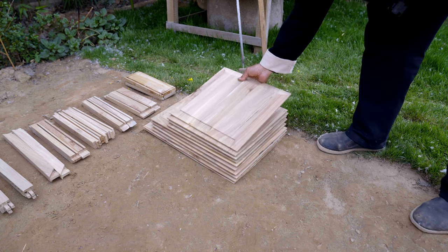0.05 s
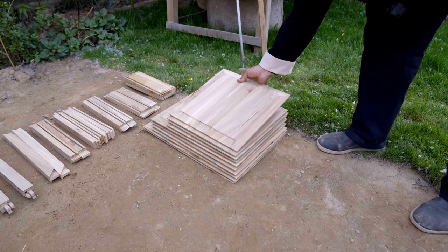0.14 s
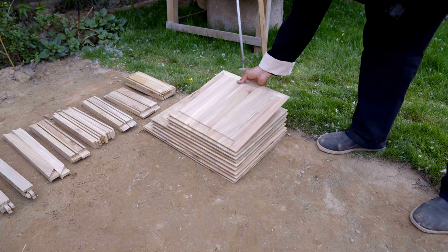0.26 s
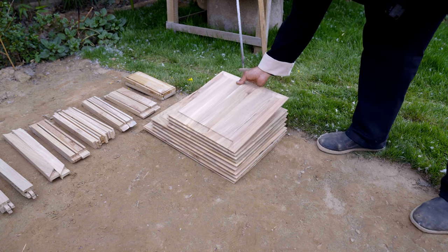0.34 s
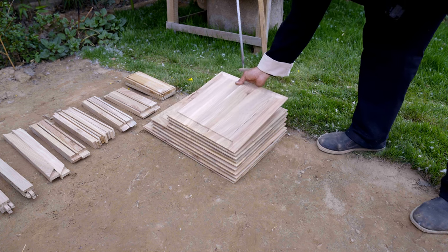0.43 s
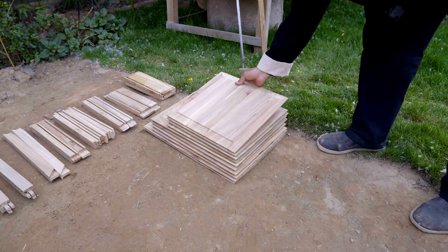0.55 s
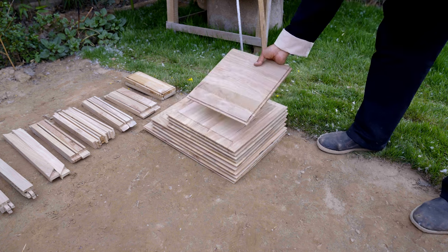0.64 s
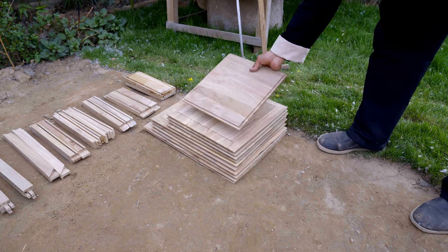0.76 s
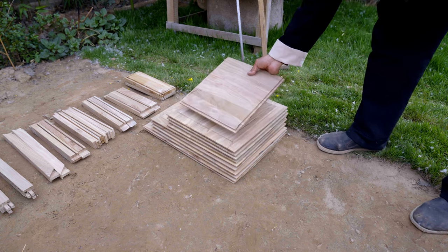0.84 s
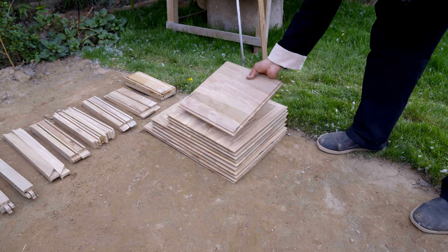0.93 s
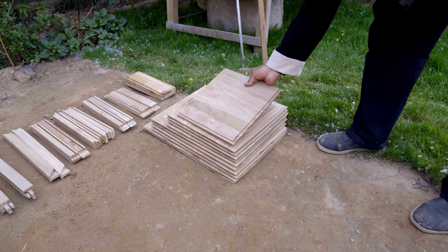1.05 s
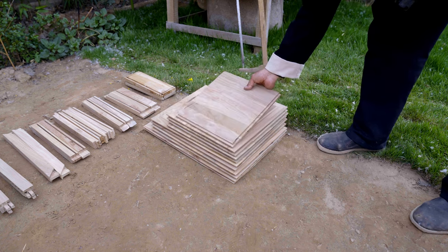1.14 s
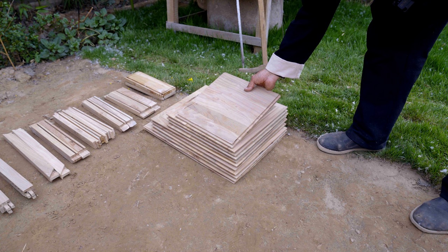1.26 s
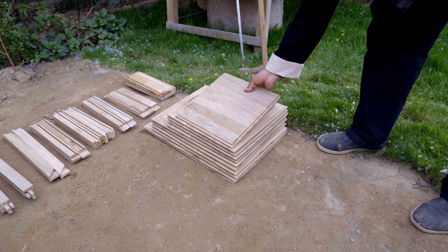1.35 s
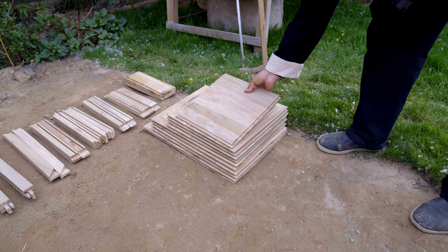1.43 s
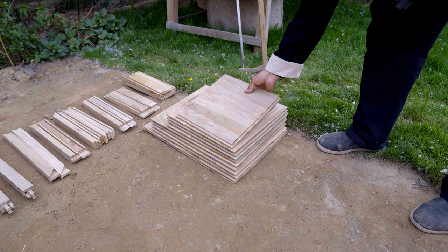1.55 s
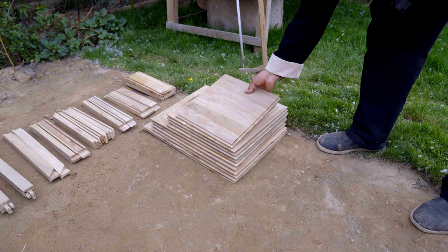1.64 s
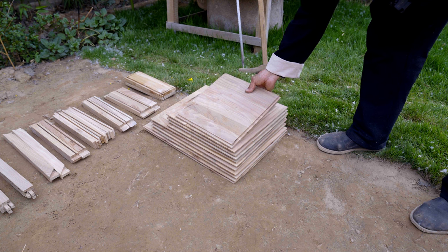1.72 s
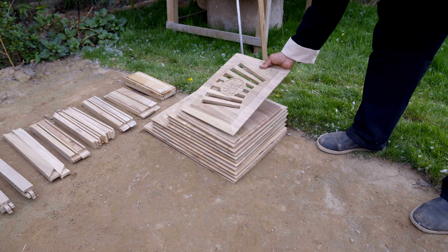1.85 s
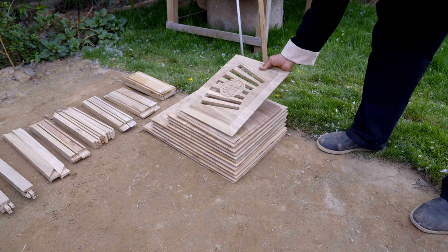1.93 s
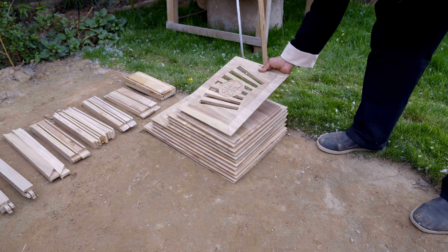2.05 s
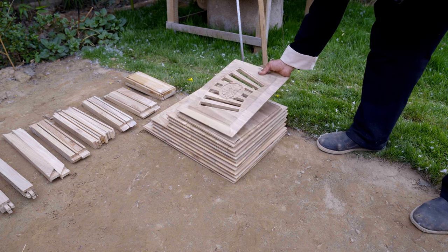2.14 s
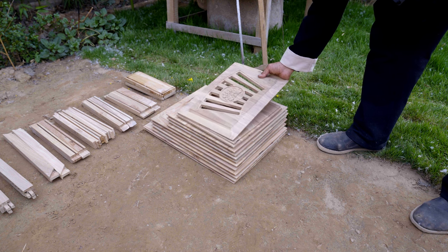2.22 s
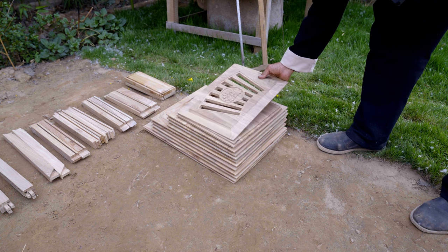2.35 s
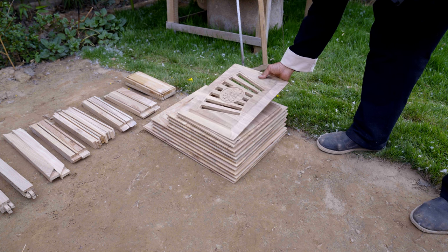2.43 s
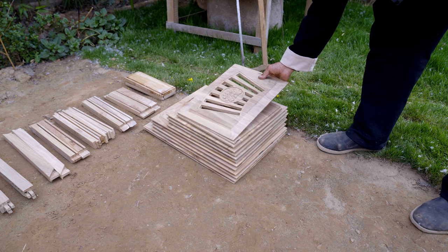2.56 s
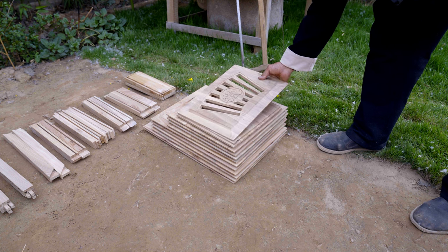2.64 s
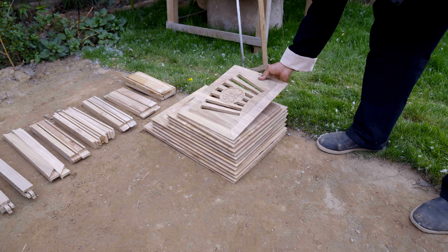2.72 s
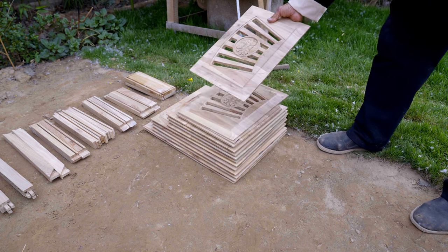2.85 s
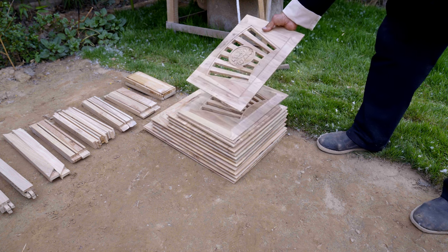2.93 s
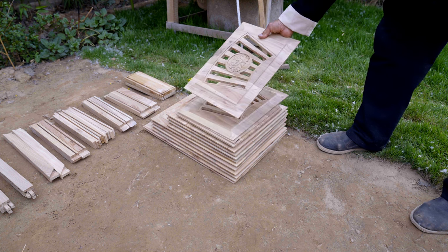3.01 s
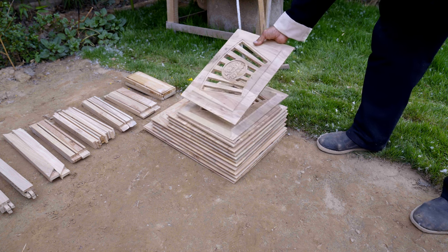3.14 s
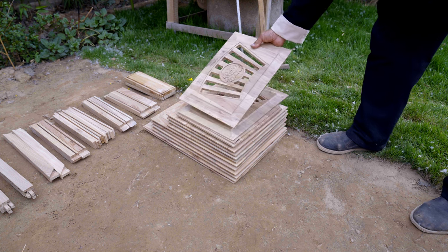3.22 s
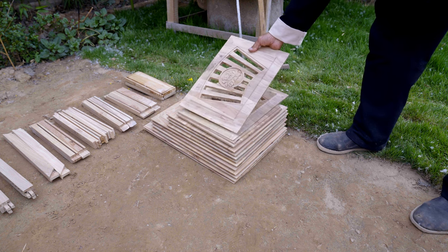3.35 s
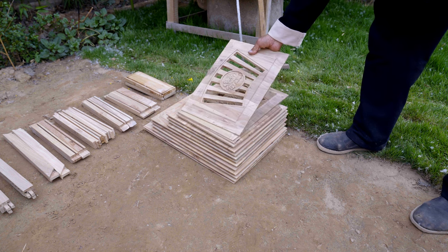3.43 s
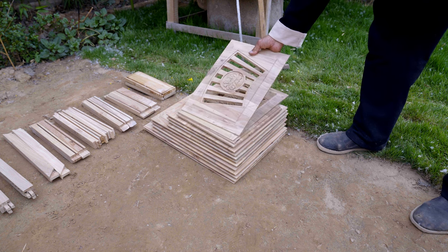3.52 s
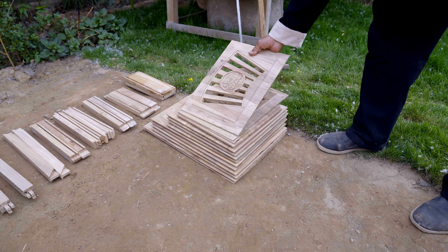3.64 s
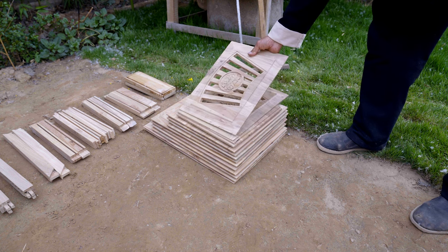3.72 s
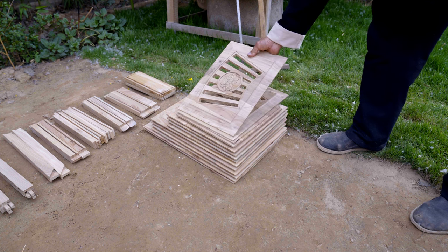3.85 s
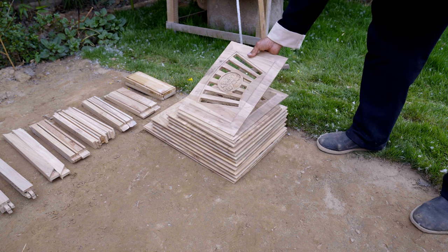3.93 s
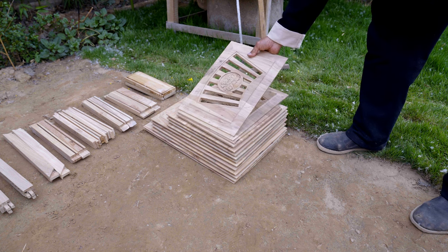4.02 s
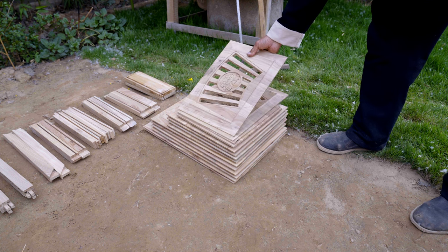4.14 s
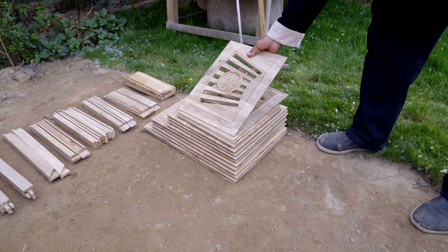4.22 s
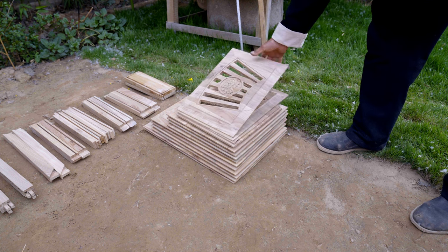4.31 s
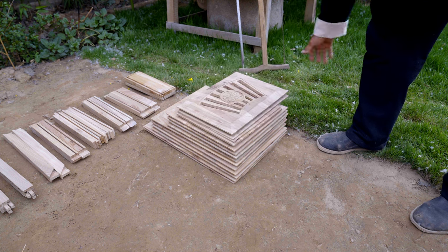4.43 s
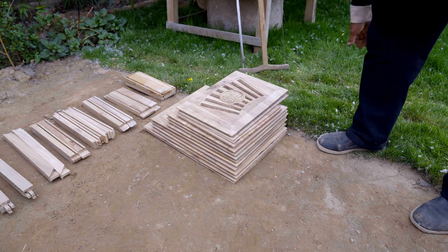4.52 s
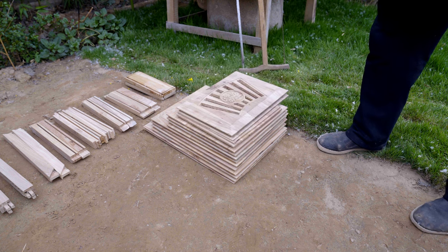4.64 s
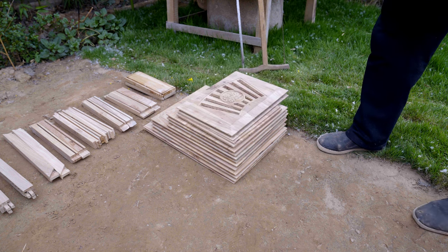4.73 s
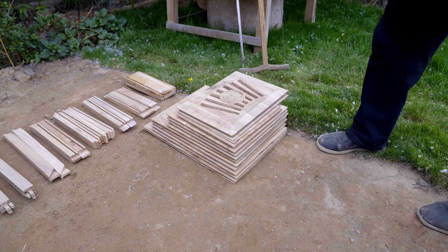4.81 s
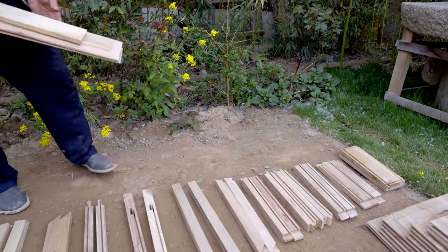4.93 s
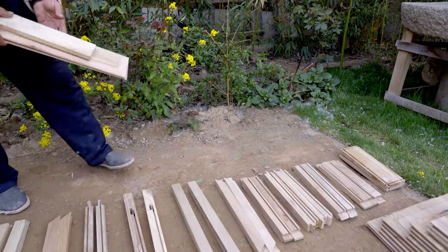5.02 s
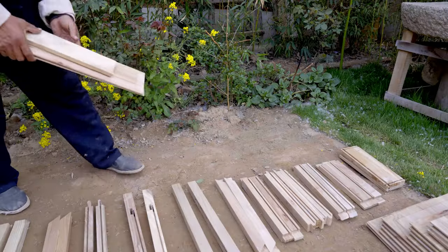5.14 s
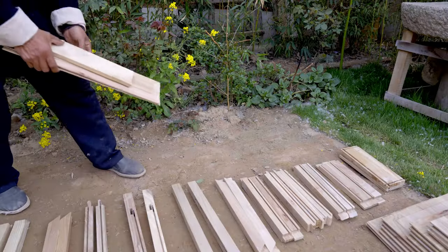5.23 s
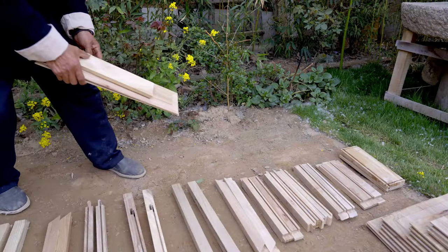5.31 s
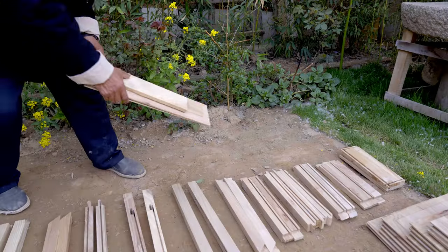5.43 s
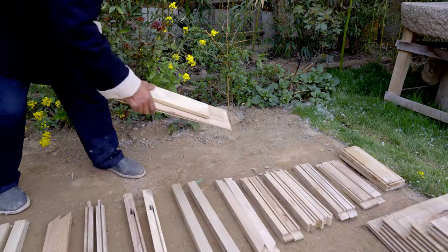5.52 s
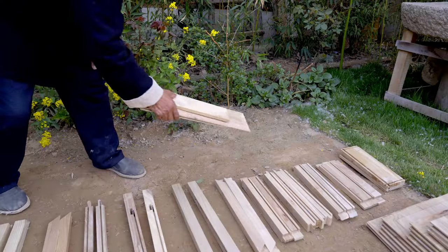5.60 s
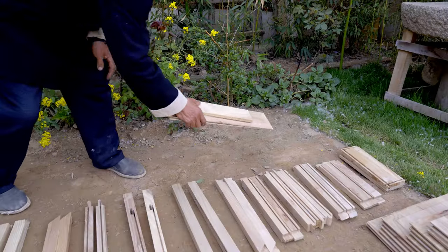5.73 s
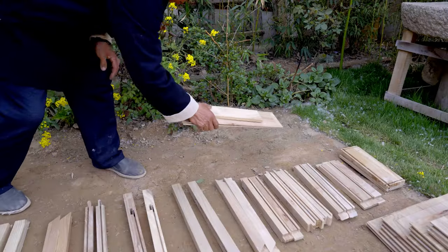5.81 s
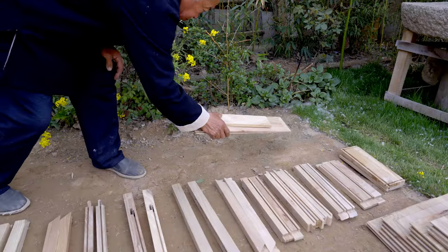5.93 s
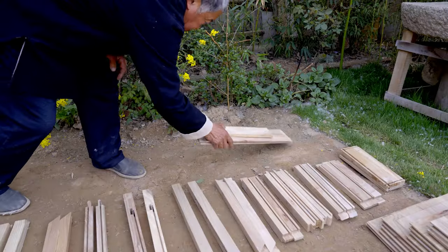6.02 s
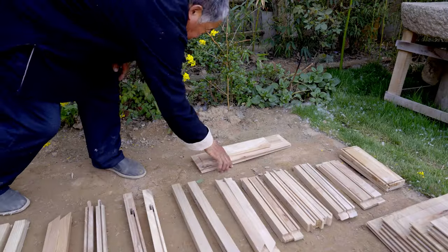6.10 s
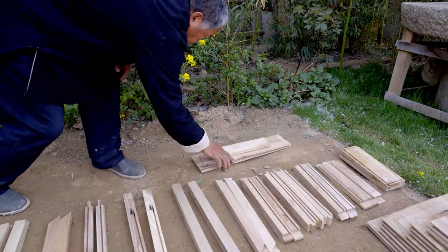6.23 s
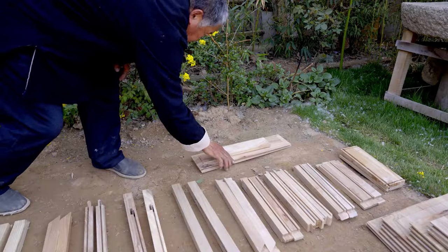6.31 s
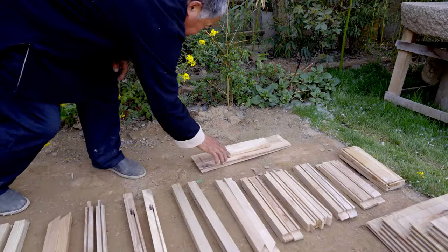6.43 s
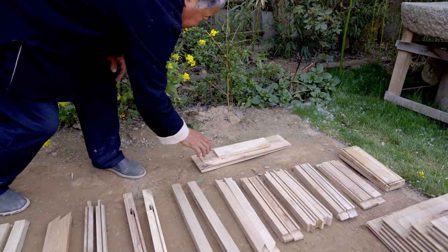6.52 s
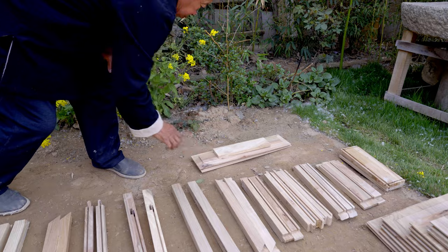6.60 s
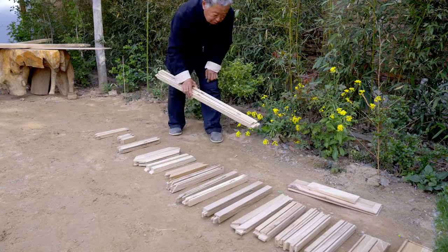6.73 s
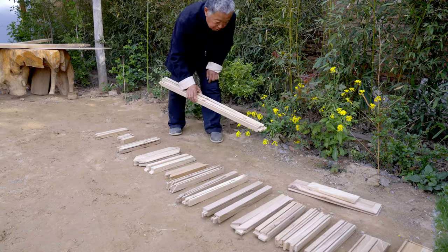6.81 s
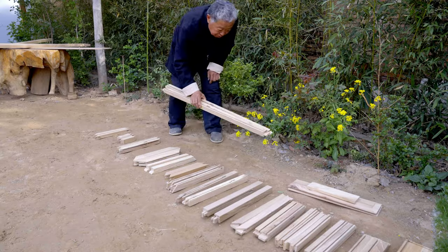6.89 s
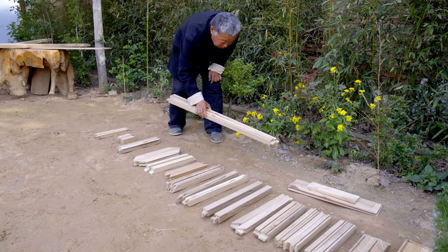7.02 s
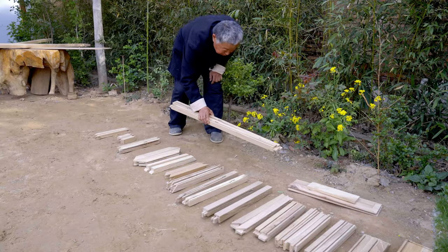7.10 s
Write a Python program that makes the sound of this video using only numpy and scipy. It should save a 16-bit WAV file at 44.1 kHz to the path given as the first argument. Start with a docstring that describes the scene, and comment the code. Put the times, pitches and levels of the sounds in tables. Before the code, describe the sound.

A sharp double clack of a wooden panel landing on a stack opens the sound, followed by a few small knocks up to 0.5 seconds. Softer hollow taps come at about 1.2 seconds, a brighter clack at 2.3 and a muted knock at 3.5. Distant birds give short falling calls from about 1.8 to 4 seconds. At 4.3, wind thumps the microphone briefly while a panel scrapes faintly across the pile, then drops with a hard clack and rattle at 4.5. A light tap follows near 4.9. At about 6.1 to 6.3 seconds, loose boards land with the loudest, brightest clatter, then settle with a couple of faint knocks. Sparrows chirp quickly from 6.7 seconds to the end, just after 7. The knocks are close, with a light yard echo. Underneath lie a quiet distant rumble, rustling leaves, bird chatter and a barely audible steady buzz.

```python
"""Planed boards and panels are knocked down onto a stack in a walled yard. Each impact excites the damped
modes of the board and the pile; loose boards rattle, one panel scrapes, and the walls reverberate.
Sparrows whistle nearby, calls from farther off scatter in foliage, and gusts thump the microphone.
Behind them lie far rumble, rustle, bird chatter, leaf hiss, a fuzzy drone and a faint steady buzz."""
import sys
import numpy as np
from scipy import signal
from scipy.io import wavfile
from scipy.ndimage import uniform_filter1d

SR = 44100
rng = np.random.default_rng(int(sys.argv[2]) if len(sys.argv) > 2 else 0)


def to_wav(sig):
    """Store sig (one row per channel, or 1-D mono) as 16-bit WAV at the path in sys.argv[1].

    Samples outside -1..1 are clipped; the rate is SR.
    """
    pcm = np.clip(np.atleast_2d(sig), -1, 1) * 32767
    pcm = np.round(pcm).astype(np.int16)
    wavfile.write(sys.argv[1], SR, pcm.T)  # frames by channels


N = 315756

# Modes of a board, a hollow panel and the pile: pitch_hz, relative_db, unscaled_t60_s
BOARD_MODES = [(1340, 8, 0.022), (1576, 1.5, 0.077), (1670, 1, 0.014), (1940, 0, 0.038), (2140, -1.5, .05),
               (2360, -9, 0.0087), (2633, 4.5, 0.035), (2620, -3.5, 0.0086), (3120, 5.5, 0.03),
               (3555, 3.5, 0.023), (3850, 3, 0.032), (4026, 0.5, 0.041), (4460, 1.5, 0.018),
               (4840, 4, 0.033), (5487, 0.5, 0.028), (5900, -8, 0.018), (7620, -3, 0.048)]
PANEL_MODES = [(627, 3, 0.067), (739, -8.5, 0.042), (841, -6, 0.11), (932, 0.5, 0.051), (1041, 0.5, .06),
               (1173, 0.5, 0.076)]
STACK_MODES = [(157, -17, 0.037), (202, -19.5, 0.056), (276.7, 8, 0.17), (356, -6, 0.031), (376.4, 8, 0.18),
               (455, 11.5, 0.12)]
# Impacts: start_s, clack_peak_db, centre_hz, hollow_db, thud_db, crack_db, contact_decay_s
KNOCKS = [(0.0279, -2.5, 2760, -9, -22, -16.5, 0.004), (0.0375, -4.5, 2280, -12.5, -16, -14.5, 0.0037),
          (0.0456, -18.5, 1320, -14.5, -14.5, -54, 0.01), (0.054, -12.5, 1480, -1.5, -21.5, -41, 0.0024),
          (.1126, -13, 1410, -12, -8.5, -49.5, 0.0031), (0.1299, -30.5, 1330, 8.5, 5, -21, 0.0034),
          (0.4291, -46, 1630, -4, -6, 4.5, 0.015), (0.4656, -44, 3580, -15, -25, 0, .006),
          (1.1557, -26.5, 2600, -17, -45, -16, 0.0022), (1.176, -34.5, 2380, -0.5, -28, -16, 0.0092),
          (1.205, -26, 1330, -3.5, -26, -43, 0.0029), (1.2156, -36.5, 1400, 9, -26, -33, .0031),
          (1.257, -35.5, 1400, 10.5, 0, -34.5, .0016), (1.291, -33, 1300, 2, -11, -33, 0.00079),
          (2.2591, -10, 3300, -16.5, -18, -51, 0.0046), (2.2832, -13.5, 2900, -11, -26, -36, 0.002),
          (2.3033, -22, 1520, -9, -16.5, -24, 0.0034), (2.375, -36, 1340, 0, -3.5, -23, 0.0032),
          (2.4505, -35, 3950, -14, -11, -14, .0045), (3.48, -23, 2450, -12, -10, -34, 0.0038),
          (3.5108, -25.5, 1570, -0.5, -11, -12, 0.0032), (4.4291, -24, 2200, -10.5, -10, -17.5, .002),
          (4.4768, 1.5, 3130, -31, -32, -0.8, 0.0064), (4.5122, -11, 1650, -36.5, -15.5, -23.5, 0.0067),
          (4.5811, -6.5, 3170, -10.5, -22, -42, 0.0034), (4.9125, -35, 2490, -12, -40.5, -20, 0.0094),
          (4.9349, -35.5, 1565, -9, -22, -13.5, 0.0081), (6.119, -4, 2020, -30, -22, -24, 0.0066),
          (6.1375, -.5, 3760, -13.5, -19.5, -37, 0.0045), (6.1456, -5.5, 1500, -39, -37, -38, 0.0072),
          (6.1608, -14.5, 2850, -20, -26, -16, 0.0069), (6.172, 8.5, 3800, -23, -37, -29, 0.0047),
          (6.1947, -1, 3170, -31.5, -45, -1.5, 0.0084), (6.2244, -11, 3020, -29, -39, -28, 0.0024),
          (6.4297, -29.5, 1327, -6, -29, -51.5, 0.0024), (6.6615, -47, 1730, -9, 1, -6, .002)]
def knock(db, centre_hz, hollow_db, thud_db, crack_db, contact_decay_s, decay_scale):
    """Impact excitation: a dying burst of tiny contacts rings board and pile, relative to the clack."""
    t = np.arange(3000) / SR
    grit, size = rng.standard_normal((2, len(t)))
    pressure = np.minimum(t / .0005, 1) * np.exp(-t / contact_decay_s)
    contacts = grit * gain_of(7.7 * size) * pressure
    contacts[8:14] += gain_of(9) * np.hanning(8)[1:-1]  # the first touch is the hardest
    push = np.exp(-t / .0007) * (1 + .36 * grit)  # low modes feel the blow as one push
    clack = signal.fftconvolve(contacts, ring(BOARD_MODES, .32 * decay_scale, centre_hz))
    hollow = signal.fftconvolve(push, ring(PANEL_MODES, .99 * decay_scale, spread=.023, count=2))
    thud = signal.fftconvolve(push, ring(STACK_MODES, .85))
    sound = peaked(clack) + gain_of(hollow_db) * peaked(hollow) + gain_of(thud_db) * peaked(thud)
    sound[:len(t)] += gain_of(crack_db) * peaked(crack(grit * pressure ** 2))
    return gain_of(db) * sound

def ring(modes, decay_scale, centre_hz=None, octaves=1.27, spread=.065, count=6):
    """Modal superposition: clusters of damped sines, weighted by where the blow lands."""
    hz, db, t60 = np.transpose(modes * count)[:, :, None]
    t = np.arange(3600) / SR
    place, detune, side = rng.standard_normal((3, len(hz), 1))
    if centre_hz:  # the contact favours modes near its centre
        db = db - 10.2 * (np.log2(hz / centre_hz) / octaves) ** 2
    decay = gain_of(db + 2.8 * place - 60 * t / (t60 * decay_scale))
    return (decay * np.sign(side) * np.sin(2 * np.pi * hz * (1 + spread * detune) * t)).sum(0)

def crack(contacts):
    """Direct radiation: the bright edge of a contact travels straight through the air."""
    return butterworth(contacts, 2, [4400, 8600], "bandpass")

# Loose boards: start_s, end_s, first_db, last_db, centre_hz, relative_grit_db
RATTLES = [(4.487, 4.518, -21.5, -20.5, 2230, -15.5), (4.52, 4.59, -30, -45.5, 2880, -10.5),
           (6.174, 6.202, -11.5, -12, 2820, -8.5), (6.202, 6.224, -28, -21, 3000, -12),
           (6.226, 6.291, -16.5, -51, 3200, -26)]
def rattle(start, end, first_db, last_db, centre_hz, grit_db):
    """Random excitation: dense uneven contacts keep the modes ringing while boards settle."""
    db = np.linspace(first_db, last_db, round((end - start) * SR))
    grit, size = rng.standard_normal((2, 4, 6000))
    contacts = grit * gain_of(2.3 * size)
    steady = slice(1000, len(db) + 1000)
    board = sum(signal.fftconvolve(c, ring(BOARD_MODES, .21, centre_hz, octaves=.99)) for c in contacts)
    hollow = signal.fftconvolve(contacts[0], ring(PANEL_MODES, .6))
    sound = unit_rms(board[steady]) + gain_of(-15) * unit_rms(hollow[steady])
    sound += gain_of(grit_db) * unit_rms(crack(contacts[0])[:len(db)])
    return gain_of(db) * sound * signal.windows.tukey(len(db), .08)

def landing_hiss():
    """Exponential decay: a thin hiss dies away as one panel lands."""
    hiss = noise([(6000, -26), (9000, -5), (14000, 3.5), (16500, -8)], 1.5)
    return hiss * envelope([[(1.154, -47), (1.204, -103)]])

# A panel sliding over the pile: time_s, level_db
SCRAPE = [(4.262, -69), (4.33, -55), (4.37, -42.5), (4.442, -42.5)]
def scrape_gains():
    """Sliding friction: rising gains for the low, middle and high noise of the scrape."""
    return gain_of([1.5, -3, -10.5])[:, None] * envelope([SCRAPE])

# Echo of the yard: frequency_hz, t60_s, relative_db
YARD_BANDS = [(201, 0.26, 3.5), (705.6, 0.95, -0.5), (2000, 0.62, -1), (3980, 0.76, -2), (7980, 0.41, 1),
              (10900, 0.11, 1.5), (15000, .15, -6)]
def yard(x):
    """Reverberation: sparse reflections from walls and ground die away at each band's own rate."""
    taps = np.zeros(SR)
    arrivals = np.arange(700, SR - 20, 20) + rng.integers(0, 20, (SR - 701) // 20)
    taps[arrivals] = rng.choice([-1., 1.], arrivals.shape)
    hz, t, spectra = signal.stft(taps, SR, nperseg=256)
    t60, db = (at_hz(np.array(YARD_BANDS)[:, [0, k]], hz)[:, None] for k in (1, 2))
    tail = signal.istft(spectra * gain_of(db - 60 * t / t60), SR, nperseg=256)[1]
    return signal.fftconvolve(x, tail / np.linalg.norm(tail))[:N]

# Near sparrows: start_s, unclipped_length_s, top_pitch_level_db, first_hz, middle_hz, last_hz
CHIRPS = [(.16, .08, -60, 4700, 4570, 4300), (1.47, .05, -62, 7000, 5800, 5370),
          (1.5, .065, -57.5, 4900, 4320, 4300), (2.05, 0.042, -48.5, 3910, 4020, 3900),
          (2.14, 0.046, -61, 3850, 4000, 3930), (3.01, 0.078, -66.5, 6100, 5780, 5900),
          (3.72, 0.21, -64, 3480, 3350, 3450), (6.709, 0.022, -48, 4730, 4260, 4680),
          (6.779, 0.025, -34.5, 3420, 4660, 4370), (6.799, .008, -35, 4330, 3700, 3200),
          (6.805, .022, -44.5, 3540, 3530, 2860), (6.826, 0.044, -48, 2800, 2015, 1890),
          (6.912, 0.0226, -46, 6300, 5550, 5400), (6.915, 0.0205, -49.5, 4270, 3400, 3200),
          (7.008, 0.031, -43.5, 5360, 5750, 6130), (7.012, 0.023, -53.5, 2840, 2960, 3130),
          (7.034, 0.0235, -31, 4320, 5230, 5380), (7.055, 0.017, -34, 5320, 4290, 3220),
          (7.069, 0.029, -40.5, 3380, 3950, 3500), (7.092, 0.034, -43, 3090, 2860, 3100)]
def chirp(length, db, *pitch_hz):
    """Frequency and amplitude modulation make a gliding whistle hoarse and fluttering."""
    progress = np.arange(0, 1, 1 / (SR * np.clip(length, .01, .17)))
    glide = np.polyval(np.polyfit([0, .5, 1], pitch_hz, deg=2), progress)
    phase = 2 * np.pi * np.cumsum(glide * (1 + .04 * wander(len(glide), 25))) / SR
    tone = np.sin(phase) + gain_of(-24.5) * np.sin(2 * phase) + gain_of(-34) * np.sin(3 * phase)
    flutter_db = 4.5 * wander(len(glide), 60)
    pitch_db = 17 * np.log2(glide / glide.max())  # loudest at the top pitch
    return np.sqrt(2) * gain_of(db + pitch_db + flutter_db) * tone * signal.windows.tukey(len(tone), .35)

# Birds farther off: start_s, peak_db, whistle_length_s
FAR_CALLS = [(1.8186, -32.5, 0.05), (1.879, -44, 0.044), (1.982, -35.5, 0.053), (2.017, -38.5, .067),
             (2.399, -38, 0.047), (2.517, -34, 0.041), (2.623, -36.5, 0.04), (2.7006, -36, 0.14),
             (2.763, -31.5, 0.05), (3.142, -34, 0.043), (3.3, -42.5, 0.07), (3.358, -39.5, 0.063),
             (3.55, -40, 0.052), (3.614, -42, 0.042), (4.074, -50, 0.055)]
def far_call(db, length, first_hz=4950, last_hz=3240):
    """Multiple scattering: foliage blurs a rough falling whistle into staggered copies."""
    progress = np.arange(0, 1, 1 / (SR * length))
    glide = last_hz + (first_hz - last_hz) * (1 - progress) ** 1.5
    hz = glide * (1 + .13 * wander(len(glide), 30))
    call = np.sin(2 * np.pi * np.cumsum(hz) / SR) * np.minimum(progress / .046, 1) * (1 - progress)
    t = np.arange(3000) / SR
    scatter = rng.standard_normal(len(t)) * np.exp(-t / .025) * (rng.random(len(t)) < .2)
    return gain_of(db) * peaked(signal.fftconvolve(call, scatter))

# Thumps of wind: start_s, unfiltered_peak_db, pitch_hz
GUSTS = [(4.247, -11.5, 206), (4.258, -18, 340), (4.301, -13.5, 214), (4.375, -16.5, 315),
         (6.736, -35, 123)]
def gust(db, hz, cycles=1.9):
    """Pressure pulse: air thumps the microphone with soft low cycles and a little puff."""
    turns = np.arange(0, cycles / hz, 1 / SR) * hz
    puff = unit_rms(butterworth(rng.standard_normal(3000), 2, [500, 1400], "bandpass"))
    swell = abs(np.sin(np.pi * turns / cycles)) ** .62
    return gain_of(db) * swell * (np.sin(2 * np.pi * turns) + gain_of(-27.5) * puff[:len(turns)])

# Wind between the thumps: start_s, end_s, level_db
BUFFETS = [(4.245, 4.48, -30.5)]
# Its spectrum: frequency_hz, relative_db
BUFFET_SPECTRUM = [(60, -46), (150, -3.5), (230, 2), (370, -1.5), (520, -27), (900, -75)]
def buffeting():
    """Turbulence: wind makes a short stretch of low noise."""
    return noise(BUFFET_SPECTRUM, .83) * gated(BUFFETS)

# Leaves stirring: start_s, end_s, top_db
STIRS = [(.38, .55, -65), (3.71, 3.92, -55), (3.97, 4.047, -67), (5.25, 5.754, -65.5), (5.896, 6.156, -61),
         (6.74, 6.854, -53.5), (6.877, 7.16, -58.5)]
# Their spectrum: frequency_hz, relative_db
STIR_SPECTRUM = [(1500, -34), (3000, -6.5), (5500, 1), (8500, -8), (12000, -15.5), (14000, -29),
                 (16500, -50)]
def stirring_leaves():
    """Amplitude modulation: the hiss swells and settles in half-sine arches."""
    t = np.arange(N) / SR
    swell = sum(gain_of(db) * np.sin(np.pi * np.clip((t - start) / (end - start), 0, 1))
                for start, end, db in STIRS)
    return swell * noise(STIR_SPECTRUM, 3.4, 20.5, 4.2)

# A far drone: start_s, end_s, level_db
DRONES = [(.39, .7, -63), (2.866, 3.36, -55), (3.49, 3.7, -58.5), (3.8, 4.24, -58)]
def drone(pitch_hz=719, width_hz=41):
    """Narrow-band noise is heard as a fuzzy pitch."""
    band = [(pitch_hz + k * width_hz, db) for k, db in [(-3, -60), (-1, -6), (0, 0), (1, -6), (3, -60)]]
    return noise(band, 1.1) * gated(DRONES)

# Spans of steady or fading background, with the echo and ring of their knocks:
# start_s, rumble_db, rustle_db, chatter_db, leaves_db, drift_db_per_s, echo_db, decay_scale
SPANS = [(0, -51.5, -59.5, -65, -65.5, -8, -31.5, 1.15), (0.699, -81, -78, -77, -74.5, -5, -30, 0.9),
         (1.152, -59, -65.5, -71, -71, -5, -34.5, 1.38), (1.822, -54, -60, -67, -65, -1, -31, 0.74),
         (2.866, -54, -55.5, -65.5, -70, 0, -34, 0.8), (4.241, -49, -52.5, -61.5, -66, -3.7, -23.5, .8),
         (4.88, -51.5, -54, -61, -66, -0.46, -22.5, 1.1), (6.7, -50.5, -57.5, -55, -63, -6, -25, 1.01)]
def span_at(t):
    """Step function: each span's settings hold until the next begins."""
    spans = np.array(SPANS)
    return spans[np.searchsorted(spans[:, 0], t, "right") - 1].T

# Spectra of far rumble, rustle, bird chatter and leaf hiss: frequency_hz, relative_db
RUMBLE = [(12, -43.5), (20, -19.5), (103, 0), (140, 1), (173, 0), (338, -2), (380, -7.5), (483, -9),
          (700, -20), (910, -37), (1540, -120)]
RUSTLE = [(210, -26), (350, -22.5), (382, -8.5), (707, -1.5), (1080, 0.5), (1840, -5.5), (3500, -15),
          (4550, -46), (7700, -120)]
CHATTER = [(1060, -35), (1800, -12.5), (1880, -11), (2980, -3), (3400, -1.5), (4260, -4), (5710, -13.5),
           (6470, -15), (8000, -26), (10400, -60), (17600, -120)]
LEAF_HISS = [(2650, -38), (4500, -7), (6340, -4), (12600, -16.5), (14900, -17), (16100, -23),
             (16500, -44.5)]
# Two swells of far birds, each a curve: time_s, level_db
CHATTER_SWELLS = [
    [(1.822, -47.5), (1.88, -54.5), (2.24, -59), (2.38, -55), (2.584, -46), (2.704, -51.5), (2.866, -45.5)],
    [(2.89, -54), (2.916, -57), (3.044, -71), (3.194, -49.5), (3.328, -56.5), (3.476, -49.5), (3.77, -58.5),
     (4.082, -63), (4.24, -66)],
]
def ambience_and_scrape():
    """Incoherent sources add in power: bird swells and the scrape lift bands of the background noise."""
    layers = np.array([noise(RUMBLE, 1.8), noise(RUSTLE, 1),
                       noise(CHATTER, 3.6, 5.4, 4.3), noise(LEAF_HISS, 1.3, 27, 5.2)])
    t = np.arange(N) / SR
    start, *layer_db, drift, _, _ = span_at(t)
    gains = uniform_filter1d(gain_of(np.array(layer_db) + drift * (t - start)), size=100, axis=1)
    gains[2] = np.hypot(gains[2], envelope(CHATTER_SWELLS))
    gains[1:] = np.hypot(gains[1:], scrape_gains())
    return (layers * gains).sum(0)

# Spectral envelope of the buzz: frequency_hz, harmonic_rms_db
BUZZ_SPECTRUM = [(400, -83.5), (1000, -77), (4000, -78.5), (6000, -83), (8500, -90.5), (10000, -99),
                 (12500, -94.5), (15500, -105)]
def buzz(pitch_hz=500.05):
    """Harmonic series: steady partials fuse into one faint buzz."""
    t = np.arange(N) / SR
    return sum(np.sqrt(2) * gain_of(at_hz(BUZZ_SPECTRUM, hz)) * np.cos(2 * np.pi * hz * t)
               for hz in pitch_hz * np.arange(1, 32))

def noise(spectrum, patchy_db, patch_bins=8, patch_frames=12):
    """Spectral shaping: noise of rms 1 with drifting louder patches."""
    hz = np.fft.rfftfreq(1024, 1 / SR)
    real, imag, patches = rng.standard_normal((N // 256 + 5, len(hz), 3)).T
    patches = uniform_filter1d(patches, int(patch_bins), axis=0)
    patches = unit_rms(uniform_filter1d(patches, int(patch_frames), axis=1))
    spectra = (real + 1j * imag) * gain_of(at_hz(spectrum, hz)[:, None] + patchy_db * patches)
    return unit_rms(signal.istft(spectra, nperseg=1024, noverlap=768)[1][:N])

def wander(length, span):
    """Moving averages turn noise into a slow fluctuation of rms near 1."""
    return unit_rms(uniform_filter1d(uniform_filter1d(rng.standard_normal(8000), span), span))[:length]

def envelope(curves):
    """Gain over time from curves of (time_s, level_db), silent between them."""
    t, gain = np.arange(N) / SR, np.zeros(N)
    for times, db in map(np.transpose, curves):
        inside = (t >= times[0]) & (t <= times[-1])
        gain[inside] = gain_of(np.interp(t[inside], times, db))
    return uniform_filter1d(gain, size=100)

def gated(rows):
    """Gain held steady from each start to its end."""
    return envelope([[(start, db), (end, db)] for start, end, db in rows])

def butterworth(x, order, edges_hz, kind):
    """Filters with a flat passband."""
    return signal.sosfilt(signal.butter(order, edges_hz, kind, fs=SR, output="sos"), x)

def at_hz(points, hz):
    """Interpolates on a log-frequency axis."""
    known_hz, values = np.transpose(points)
    return np.interp(np.log(hz + 1), np.log(known_hz + 1), values)

def gain_of(db):
    """Decibels to gain."""
    return 10 ** (np.asarray(db) / 20)

def unit_rms(x):
    """Scales to rms 1."""
    return x / np.sqrt(np.mean(x ** 2) + 1e-20)

def peaked(x):
    """Scales to peak 1."""
    return x / (abs(x).max() + 1e-12)

def add(mix, start, sound):
    """Mixes a sound in at its start time."""
    part = mix[round(start * SR):][:len(sound)]
    part += sound[:len(part)]

def scene():
    """Superposition: boards and birds with the yard's echo, over wind and background."""
    boards, to_yard, rattles, birds, wind = np.zeros((5, N))
    for start, db, *blow in KNOCKS:
        echo_db, decay_scale = span_at(start)[-2:]
        sound = knock(db, *blow, decay_scale)
        add(boards, start - .0003, sound)
        add(to_yard, start, gain_of(echo_db - .3 * db) * sound)  # echo stands out behind soft knocks
    for mix, source, rows in (birds, far_call, FAR_CALLS), (wind, gust, GUSTS), (birds, chirp, CHIRPS):
        for start, *settings in rows:
            add(mix, start, source(*settings))
    for start, *settings in RATTLES:
        add(rattles, start, rattle(start, *settings))
    echo = yard(to_yard + gain_of(-19.5) * rattles + gain_of(-13) * birds)
    near = butterworth(boards + rattles + wind + echo, 4, 135, "highpass")
    mix = near + landing_hiss() + birds + ambience_and_scrape()
    return (mix + stirring_leaves() + drone() + buffeting())[None]

def record(dry):
    """Saturation and band limiting: the buzz joins, peaks are rounded and the top treble is cut."""
    x, ceiling, edge_hz = dry + buzz(), .85, 16050
    rounded = x / (1 + abs(x / ceiling) ** 4) ** (1 / 4)
    lowpass = signal.firwin(511, edge_hz, window=("kaiser", 9), fs=SR)
    return signal.oaconvolve(rounded, lowpass[None], "same")

dry = scene()
out = record(dry)
to_wav(out)
```